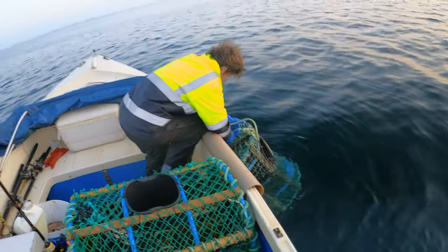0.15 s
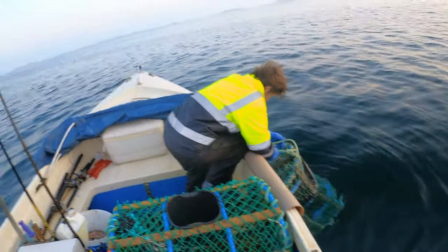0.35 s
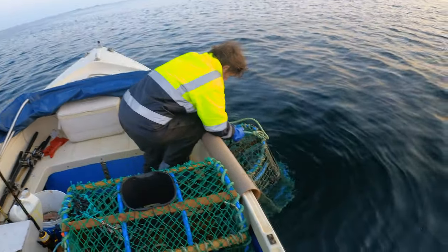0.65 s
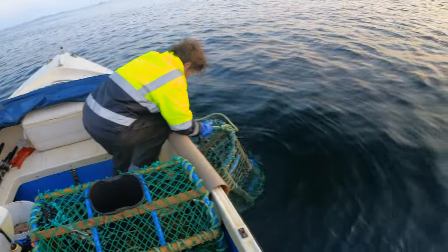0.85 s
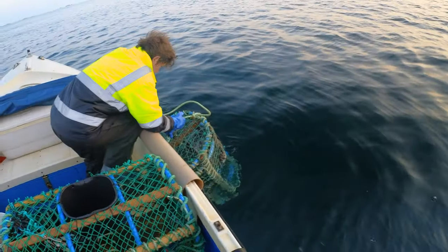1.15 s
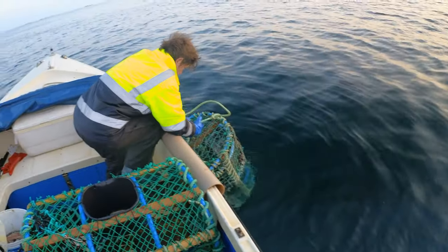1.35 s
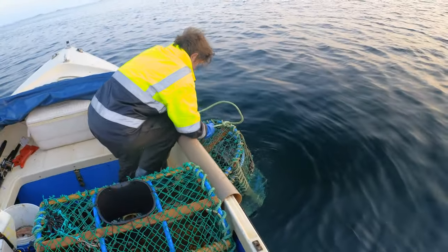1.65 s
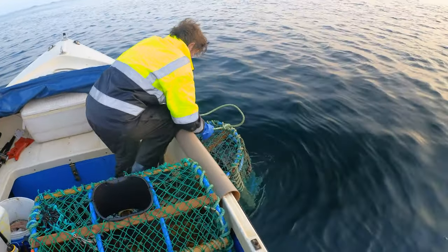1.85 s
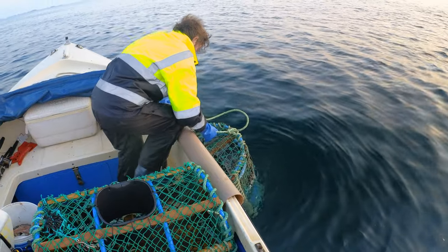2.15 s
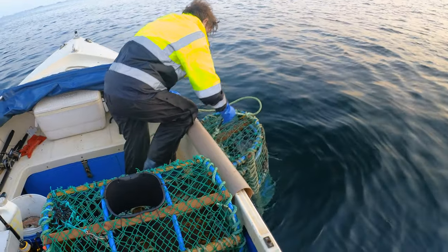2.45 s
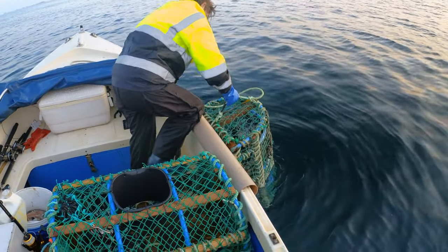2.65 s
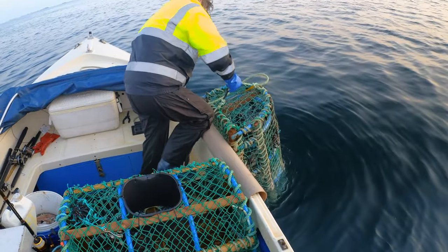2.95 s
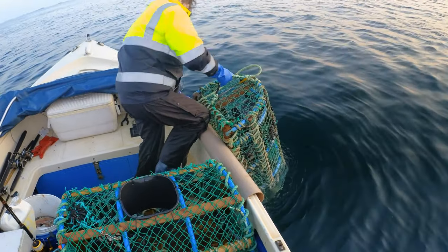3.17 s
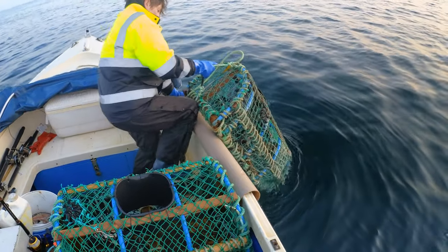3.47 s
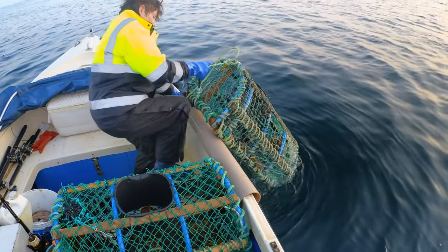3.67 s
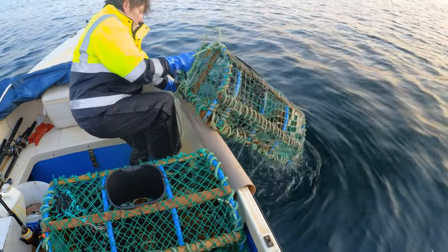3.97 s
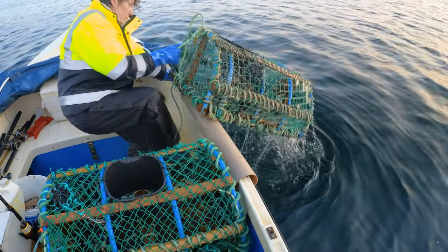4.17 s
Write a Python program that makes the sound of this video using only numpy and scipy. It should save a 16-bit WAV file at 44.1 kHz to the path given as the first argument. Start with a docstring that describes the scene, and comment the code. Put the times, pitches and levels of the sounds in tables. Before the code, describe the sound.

A small one-cylinder motor idles throughout, a low, evenly pulsing hum slightly to the right, with the sea lapping softly against an open boat. Everything is close, heard from aboard. At about 0.4 seconds knees and boots bump the hull in a quick cluster with one heavy, hollow thud, a little to the left, along with a brief scrape and slosh. Light taps and ticks follow as a netted pot touches the side. Around 2 seconds the net scrapes over the edge and the frame knocks several times. Louder thumps and hard knocks land at 2.8 and 3.1 seconds, followed by smaller clatter, short scrapes and another sharp knock at 3.6. A faint trickle runs underneath, and from 3.7 seconds plinking drops multiply, swelling into water pouring and splattering from the net into the sea from 4 seconds until the end at about 4.3.

```python
"""Knocks and scrapes sound over an idling motor as a netted pot is dragged up the side of a small open boat.
The pot's frame strikes the gunwale, and knees and boots thud on the hull: each impact excites the same
damped modes, a hard contact the high ones, a soft contact the low. Water laps, drips and finally pours
from the net as noise and resonating bubbles. The one-cylinder motor, to the right, rings with every
cycle. All of it is heard through two closely spaced ports in a small housing."""
import sys
import numpy as np
from scipy import signal
from scipy.fft import rfft, irfft, next_fast_len
from scipy.io import wavfile
from scipy.ndimage import uniform_filter1d, map_coordinates

SR = 44100
rng = np.random.default_rng(int(sys.argv[2]) if len(sys.argv) > 2 else 0)


def wrap_up_sound(samples):
    """Save the sound to the file named by the first command line argument, as 16-bit audio."""
    columns = np.atleast_2d(samples).T
    # keep every value between -1 and 1, then stretch to whole-number steps
    tamed = np.clip(columns, -1, 1)
    steps = np.round(tamed * 32767).astype(np.int16)
    wavfile.write(sys.argv[1], SR, steps)


N = 190315
ONSET_S = .002  # quiet ahead of each contact force

# Bright hiss near 12 kHz that the microphone housing gives to spray and ticks.
# Each row: frequency in Hz, relative level in dB.
TREBLE_COLOUR = [(4120, -50.5), (7000, -15), (9860, -5.5), (10800, 1.5), (11600, 5), (15000, -2),
                 (16000, -5.5)]


def amp(db):
    """Decibels expressed as an amplitude ratio."""
    return 10 ** (np.asarray(db) / 20)


def unit(x):
    """Normalisation to an rms of 1."""
    return x / np.sqrt(np.mean(x ** 2) + 1e-20)


def peak(x, db):
    """Normalisation to a peak level, taken as twice the rms of the loudest few milliseconds."""
    return amp(db) * x / (2 * np.sqrt(uniform_filter1d(x ** 2, size=200).max()))


def along(points, hz):
    """Interpolation of (Hz, value) points on a logarithmic frequency axis."""
    freqs, values = np.transpose(points)
    return np.interp(np.log(hz + 1), np.log(freqs + 1), values)


def curves(rows):
    """Level envelopes in dB, one for each column after the time; silent outside the rows."""
    times, *columns = np.transpose(rows)
    return [np.interp(np.arange(N) / SR, times, db, -120, -120) for db in columns]


def wobble(rate):
    """Smooth random modulation through rate points a second."""
    return map_coordinates(rng.standard_normal(int(N * rate / SR) + 4), [np.arange(N) * rate / SR])


def filtered(x, response):
    """Linear filtering: the spectrum is multiplied by a complex frequency response."""
    size = next_fast_len(x.shape[-1] + 2048)
    return irfft(rfft(x, size) * response(np.fft.rfftfreq(size, 1 / SR)), size)[..., :x.shape[-1]]


def dulled(x, hz):
    """Low-pass action: a yielding contact passes little above hz."""
    return filtered(x, lambda f: 1 / (1 + 1.4j * f / hz - (f / hz) ** 2) ** 2)


def panned(x, pan_db):
    """A level difference between the ports places a source; positive is to the left."""
    return x * amp([[pan_db / 2], [-pan_db / 2]])


def spread(x, other, share):
    """Decorrelation: part of the treble reaches the two ports by unlike paths."""
    side = share * other * np.linalg.norm(x) / np.linalg.norm(other)
    return np.array([x + side, x - side])


def add(out, x, start_s):
    """Superposition of x on out from start_s."""
    i = round(start_s * SR)
    out[:, max(i, 0):max(i + x.shape[1], 0)] += x[:, max(-i, 0):max(out.shape[1] - i, 0)]


def rush(spectrum, pan_db, patchy_db, size=(6, 8)):
    """Partly coherent stereo noise of rms 1, its gain varying in patches of size (bands, frames)."""
    # Likeness of the two ports. Each row: frequency in Hz, correlation.
    coherence = [(60, 0.83), (300, 0.8), (1000, 0.82), (2500, 0.19), (5000, 0.86), (12000, 0.36)]
    cells = signal.stft(rng.standard_normal((2, N)), nperseg=512)[2]
    patches = uniform_filter1d(rng.standard_normal(cells.shape[1:]), size[0], 0)
    patches = uniform_filter1d(patches, size[1], 1)
    pair = signal.istft(cells * amp(patchy_db * unit(patches)), nperseg=512)[1][:, :N]
    angle = lambda f: np.arccos(np.clip(along(coherence, f), -1, 1)) / 2
    mid, side = filtered(pair, lambda f: amp(along(spectrum, f)) * [np.cos(angle(f)), np.sin(angle(f))])
    return unit(panned(np.array([mid + side, mid - side]), pan_db))


def motor():
    """Periodic excitation: each cycle rings exhaust, casing and cowl, over a drone pulsing in step."""
    # Resonances of one cycle. Each row: delay in seconds, frequency in Hz, peak in dB,
    # rise time in seconds, time to decay by 60 dB in seconds.
    resonances = [(0.02184, 219, -27.5, 0.034, 0.09), (0.0393, 205.6, -43.5, 0.0069, 0.046),
                  (0.0028, 250, -40.5, 0.0073, 0.14), (.042, 270, -30, 0.017, 0.083),
                  (0.14, 250, -37.5, 0.016, 0.2), (0.168, 274.5, -40.5, 0.0051, 0.19),
                  (0.0612, 725, -43, 0.0021, 0.32), (.136, 735, -39.5, 0.015, 0.041)]
    # Casing noise. Each row: frequency in Hz, relative level in dB.
    drone_spectrum = [(88, -41), (150, -3.5), (269, -0.5), (453, -15.5), (588, -15.5), (730, -9),
                      (957, -20.5), (1300, -20), (1480, -27), (2000, -43.5), (2600, -81), (4400, -120)]
    cycle_s, first_s = .14805, -.0422  # a cycle is two turns of the shaft
    out, t = np.zeros((2, N)), np.arange(SR // 5) / SR
    for start in first_s + cycle_s * np.arange(-1, 31):
        for delay, hz, db, rise, t60 in resonances:
            late, strength, detune = rng.standard_normal(3)
            envelope = amp(-60 * t / t60) * (1 - np.exp(-t / rise)) ** 2
            ring = np.sin(2 * np.pi * hz * (1 + .012 * detune) * t) * envelope
            add(out, panned(peak(ring, db + 1.4 * strength), -4.5), start + delay + 0.001327 * late)
    pulse = np.cos(2 * np.pi * (np.arange(N) / SR - first_s - .09) / cycle_s)
    return out + amp(-39.5 + 0.53 * pulse) * rush(drone_spectrum, pan_db=-5, patchy_db=0.5)


def slosh():
    """Amplitude-modulated noise: the swell laps on the hull with a low, uneven wash."""
    # Strength of the swell. Each row: time in seconds, level in dB.
    swell = [(0, -41.5), (.3, -36), (.4, -25), (.61, -55), (.85, -58), (1.09, -43), (1.39, -35.5),
             (1.84, -40), (2.21, -34), (2.7, -42.5), (2.94, -39), (3.33, -54.5), (4.08, -38), (4.32, -43.5)]
    # Lapping water. Each row: frequency in Hz, relative level in dB.
    spectrum = [(15, -64), (25, -48.5), (89, -8), (211, -11), (303, -32.5), (394, -19), (500, -24),
                (650, -49), (1100, -120)]
    return amp(curves(swell)[0] + 3.83 * wobble(14)) * rush(spectrum, pan_db=-8.5, patchy_db=-0.5)


def bubbles(start_s, db, hz, cycles):
    """Bubble resonance: sines of slightly rising pitch swell for the given cycles, then decay."""
    k = np.arange(500)
    age = k * hz[:, None] / SR / cycles[:, None]  # 1 at the envelope's crest
    envelope = np.e ** 2 * age ** 2 * np.exp(-2 * age)
    phase = 2 * np.pi * cycles[:, None] * (age + 0.014 * age ** 2)
    waves = amp(db)[:, None] * np.sin(phase) * envelope
    samples = (start_s * SR).astype(int)[:, None] + k
    return np.bincount(samples.ravel(), waves.ravel(), N + 500)[:N]


def runoff():
    """Water running from the net radiates broadband noise and the resonances of many small bubbles."""
    # Flow from the net. Each row: time in seconds, relative levels of trickle and of spray in dB.
    flow = [(0, -58.5, -60.5), (.3, -63, -64.5), (.6, -55, -61.5), (.76, -68.5, -72), (1.09, -60.5, -65),
            (1.4, -66, -73), (1.62, -59.5, -63), (2.03, -68.5, -70), (2.15, -61, -66), (2.36, -57, -61.5),
            (2.58, -83, -81), (2.82, -55.5, -61), (3.04, -57.5, -70.5), (3.45, -58, -68.5),
            (3.7, -54.5, -60), (3.9, -54, -62.5), (4.07, -47, -54), (4.32, -43.5, -47.5)]
    # Trickling water. Each row: frequency in Hz, relative level in dB.
    trickle_spectrum = [(240, -50), (400, -22.5), (471, -18), (568, -3), (758, -3), (1020, -2.5),
                        (1330, -3.5), (4120, -13), (4970, -22.5), (8000, -39.5), (10400, -48),
                        (17600, -120)]
    trickle_db, spray_db = curves(flow)
    when, size, pitch, life = rng.random((4, 3000))
    fizz = bubbles(when * N / SR, -4.5 * np.log(size + 0.0019), 700 * 6.2 ** pitch, 2 + 2.9 * life)
    fizz = dulled(fizz, hz=4530) * amp(0.29 * trickle_db)  # a fuller flow bubbles louder
    stream = rush(trickle_spectrum, pan_db=-4.5, patchy_db=4, size=(10, 2))
    trickle = amp(trickle_db) * (amp(5.5) * stream + amp(-5.5) * panned(unit(fizz), -1.5))
    spray_gain = amp(spray_db + 2.4 * wobble(24.04) + 2.1 * wobble(250))
    return trickle + spray_gain * rush(TREBLE_COLOUR, pan_db=-4.5, patchy_db=2.5, size=(16, 2))


def drips():
    """Each drop sounds one bubble resonance; the higher ones ring for more cycles."""
    # Single drops. Each row: start in seconds, peak in dB, frequency in Hz.
    drops = [(0.821, -46, 3210), (3.5244, -44, 2280), (3.706, -44, 3500), (3.724, -45, 740),
             (3.7294, -46, 2470), (3.8355, -42, 2280), (3.864, -36, 693), (3.9335, -44.5, 4330),
             (3.9534, -42.5, 1830), (3.994, -38.5, 780), (4.023, -35.5, 825), (4.054, -35.5, 635),
             (4.0707, -32, 2010), (4.0815, -35, 3600), (4.099, -34, 990), (4.1298, -29.5, 3970),
             (4.1354, -39, 2420), (4.164, -39, 583), (4.184, -40, 893), (4.2155, -36.5, 2900),
             (4.2554, -31, 2450), (4.275, -31, 1070), (4.294, -35, 797)]
    start_s, db, hz = np.transpose(drops)
    return panned(bubbles(start_s, db, hz, cycles=4.7 + 0.8 * np.log2(hz / 1000)), -2.2)


def hull(force, weight_db, ring=1):
    """Modal response to a force; ring scales the decay times, which a body resting on the hull shortens."""
    # Modes of hull and gunwale. Each row: frequency in Hz, relative level in dB,
    # free time to decay by 60 dB in seconds.
    modes = [(100, 3, 0.23), (135, 2, 0.14), (180, -3, 0.09), (238.2, 1, 0.18), (300.6, 4.5, 0.22),
             (385.7, -1, 0.071), (489.4, 0, 0.094), (595, -3.5, 0.053), (743, -1.5, 0.052),
             (911.2, 1.5, 0.12), (1008, -4.5, 0.11), (1123, -4, 0.045), (1302, -4.5, 0.05),
             (1517, -9.5, 0.021), (1847, -9, 0.039), (2040, -11, 0.028), (2360, -14, 0.076),
             (2704, -19, 0.3), (3220, -17, 0.032), (3600, -23, 0.024), (3900, -22, 0.031)]
    resonators = []
    for k, (hz, db, t60) in enumerate(modes):
        gain = (-1) ** k * amp(db + weight_db(hz) + 2.2 * rng.standard_normal())
        bandwidth = np.log(1000) / (np.pi * t60 * ring)
        resonators.append((hz, gain, bandwidth))
    return filtered(force, lambda f: sum(gain * 1j * f * width / (hz ** 2 - f ** 2 + 1j * f * width)
                                         for hz, gain, width in resonators))


def contact(decay_s, jolt):
    """Impact force: an impulse of size jolt, then chatter that decays exponentially."""
    t = np.arange(int(.28 * SR)) / SR
    chatter = rng.standard_normal(len(t)) * np.exp(-t / decay_s)
    return np.pad(chatter / np.linalg.norm(chatter) + jolt * (t == 0), (round(ONSET_S * SR), 0))


def thuds():
    """Soft impact: knees and boots push slowly, so they excite only the hull's lower modes."""
    # Soft blows. Each row: start in seconds, peak in dB, centre frequency in Hz,
    # contact decay in seconds, left-right difference in dB.
    blows = [(.19, -22.5, 108, 0.019, 1.5), (.245, -29, 350, 0.014, 22), (.299, -23, 226, .008, 18),
             (0.353, -11.5, 182, .0046, 9.5), (0.387, -15, 164, 0.027, 16), (.398, -13.5, 180, 0.018, 15),
             (0.4386, -0.5, 135, 0.0047, 6), (.484, -14.5, 135, 0.0012, 14), (.5, -20, 127, 0.0074, 1),
             (1.751, -21.5, 210, 0.028, 0.5), (1.779, -21, 204, .013, 1), (2.191, -11, 223, .003, -3.5),
             (2.202, -9.5, 219, 0.0091, -0.5), (2.779, -4, 223, 0.019, -1), (2.791, -5.5, 190, .015, -3),
             (2.81, -13, 123, 0.031, 0), (2.837, -21.5, 111, .026, -3.5), (3.065, -5.5, 350, 0.017, 2),
             (3.08, -3.5, 297, 0.027, 0.5), (3.099, -12.5, 314, 0.019, -3),
             (3.199, -14.5, 255, 0.016, -2.5), (3.24, -19.5, 231, 0.011, -0.5),
             (3.357, -20, 260, 0.0069, -4), (3.568, -24, 249, .0063, -1)]
    out = np.zeros((2, N))
    for start, db, hz, decay_s, pan_db in blows:
        # Every blow reaches the modes near its own centre and, more weakly, those near 500 Hz.
        weight_db = lambda f: np.maximum(-12 * np.log2(f / hz) ** 2, -12 - 30 * np.log2(f / 500) ** 2)
        push = dulled(contact(decay_s, jolt=1.26), hz=735)
        thud = peak(hull(push, weight_db, ring=0.67), db)
        add(out, panned(thud, pan_db), start - ONSET_S)
    return out


def scrape():
    """Friction: knots of the net catch on the edge in turn and drive the hull's modes unevenly."""
    # Drags of the net. Each row: start in seconds, length in seconds, level in dB.
    drags = [(0.261, 0.05, -43.5), (0.401, 0.045, -32.5), (1.985, 0.16, -34.5), (2.543, 0.026, -32),
             (2.956, .09, -37.5), (3.186, 0.042, -34.5), (3.352, 0.077, -34)]
    attack_s, release_db_per_s = 0.018, 397
    t, envelope = np.arange(N) / SR, np.zeros(N)
    for start, length_s, db in drags:
        attack = np.clip(1 + (t - start) / attack_s, 0, 1) ** 2
        envelope += attack * amp(db - release_db_per_s * np.maximum(t - start - length_s, 0))
    friction = dulled(rng.standard_normal(N) * amp(4 * wobble(160)), hz=3500)
    weight_db = lambda f: along([(200, 3.3), (500, 11), (1500, 6.7), (3500, 4.9)], f)
    return panned(envelope * unit(hull(friction, weight_db)), -3.5)


def knocks():
    """Hard impact: the frame's abrupt force on the gunwale reaches the upper modes, cracks and ticks."""
    # Hard blows. Each row: start in seconds, peak of the body sound in dB, weight of its low modes in dB,
    # peaks of edge and of tick in dB relative to the body, contact decay in seconds.
    blows = [(0.093, -25.5, -25.5, -5.5, -25, 0.015), (0.389, -32, 14, -9, -26.5, .03),
             (0.421, -29, 7, -21, -27, .0095), (.442, -23.5, 13, -12.5, -33, 0.0057),
             (.484, -24.5, -6, -28, -36, .003), (.777, -26, -1.5, -11.5, -29, 0.011),
             (1.061, -44.5, 20, 2.5, -7, 0.022), (1.213, -30, 1, -4.5, -25.5, .007),
             (1.24, -36.5, -27, -10, -24, 0.0143), (1.295, -34.5, 1, -7, -24, 0.025),
             (1.44, -34.5, -9, -8.5, -19.5, 0.022), (1.575, -40.5, 18, -11, -17, 0.024),
             (1.746, -47, 1, 4.5, -8, .012), (1.837, -48, -1, 16.5, -16.5, 0.004),
             (1.967, -32.5, -3, -22, -33.5, .012), (2.037, -24, -7, -6.5, -19.5, 0.025),
             (2.065, -21, -4.5, -17, -36, 0.022), (2.084, -22, 17, -9.5, -25, 0.017),
             (2.117, -16, -5, -13, -27.5, 0.01), (2.219, -32, -16, -30, -26, 0.0098),
             (2.257, -29, 9, -33, -33, .012), (2.433, -57, 2, 13.5, 7.5, .009),
             (2.491, -26, 3, -9.5, -19.5, 0.016), (2.539, -25, -5, -17.5, -44.5, 0.041),
             (2.638, -35.5, 5, -11.5, -30, 0.014), (2.685, -41, 3, -16, -30, .011),
             (2.734, -23.5, 18.5, -41, -43, .036), (2.777, -10.5, 5, -20, -31.5, 0.021),
             (2.85, -49, 1, -9, 2, .012), (2.867, -25.5, 9.5, -9, -23, 0.015),
             (2.923, -41.5, 1, 4.5, -11, .013), (2.962, -35.5, -17, -1, -16, 0.013),
             (2.974, -30, 0, -3.5, -16, .013), (2.992, -28.5, -5, -9, -19.5, .012),
             (3.021, -30.5, 9, -5.5, -22, 0.008), (3.057, -12, -7.5, -3, -12, 0.0057),
             (3.063, -5.5, -17, -15, -31, 0.016), (3.104, -26.5, -1, -10.5, -24.5, 0.026),
             (3.17, -36, 2, -5, -13, .0076), (3.189, -25.5, 4, -.5, -13, 0.022),
             (3.239, -33.5, -11, -5, -12.5, 0.0069), (3.347, -38, -1, 3.5, -30, 0.0071),
             (3.375, -27, 1, -7, -23, 0.034), (3.419, -30, 1, -7.5, -36, 0.018),
             (3.467, -50, 0, 7, 2.5, 0.01), (3.559, -17, 0, -18, -24, .006),
             (3.566, -17, 3, -6.5, -19, 0.0062), (3.578, -9, -11.5, -17.5, -41, 0.01),
             (3.876, -44, -5, -2.5, -7, .0067)]
    ring = 0.54  # share of the hull's free decay time
    crack_spectrum = [(1500, -54), (2500, 0.5), (4200, -6.5), (5400, -21), (6500, -29.5), (9000, -55)]
    crack_band = lambda f: amp(along(crack_spectrum, f))
    housing_band = lambda f: amp(along(TREBLE_COLOUR, f))
    out = np.zeros((2, N))
    for start, db, low_db, edge_db, tick_db, decay_s in blows:
        force = contact(decay_s, jolt=0.33)
        body_weights = [(250, low_db - 2.5), (500, low_db), (1100, -2), (1700, -5), (2600, -13)]
        body = hull(dulled(force, hz=2400), lambda f: along(body_weights, f), ring)
        edge_force = dulled(contact(0.87 * decay_s, jolt=0.79), hz=4170)
        edge_modes = hull(edge_force, lambda f: along([(1500, -22), (2400, -13.5)], f), ring)
        edge = peak(unit(edge_modes) + 0.57 * unit(filtered(force, crack_band)), db + edge_db)
        tick, tick_side = (filtered(contact(0.85 * decay_s, jolt=0.25), housing_band) for _ in range(2))
        edge_side = filtered(contact(decay_s, jolt=0), crack_band)
        treble = spread(edge, edge_side, 0.22) + spread(peak(tick, db + tick_db), tick_side, 0.73)
        add(out, panned(peak(body, db) + treble, -3.5), start - ONSET_S)
    return out


def scene():
    """Superposition of the sources in and around the boat."""
    return motor() + thuds() + knocks() + scrape() + slosh() + runoff() + drips()


def record(dry):
    """Two ports differ in level and phase; soft saturation rounds the peaks ahead of a band limit."""
    # Phase between the ports. Each row: frequency in Hz, lead of the left port in radians.
    phase_lead = [(0, 1.25), (260, 0.28), (520, 0.4), (780, 0.55), (2330, 1.12), (3450, 1.03), (4050, 1.7),
                  (5680, 0.071), (6290, 0.039), (7410, 0.82), (8010, 1.6), (10900, 0.69), (11500, 0.46),
                  (16100, 0.02)]
    # Balance of the ports. Each row: frequency in Hz, left-right difference in dB.
    balance = [(100, -5.5), (1000, 0.5), (4000, -1), (9000, -7.5), (13000, 5)]
    left = lambda f: amp(along(balance, f) / 2) * np.exp(.5j * np.interp(f, *np.transpose(phase_lead)))
    ports = filtered(dry, lambda f: np.array([left(f), 1 / left(f)]))
    rounded = ports / (1 + np.abs(ports / .9) ** 4) ** (1 / 4)
    return filtered(rounded, lambda hz: hz < 15900)


dry = scene()
out = record(dry)
wrap_up_sound(out)
```